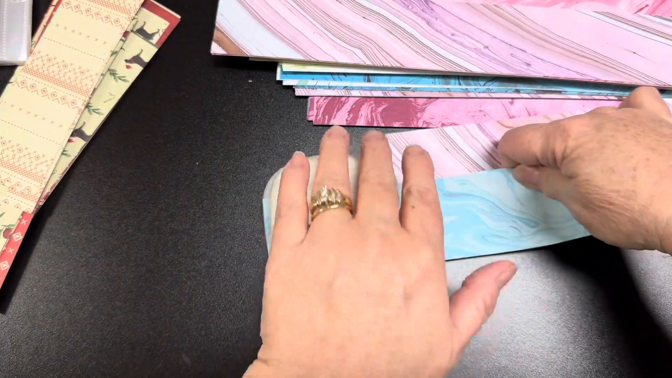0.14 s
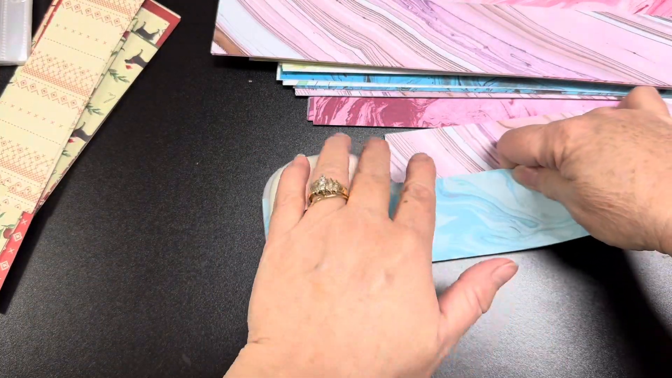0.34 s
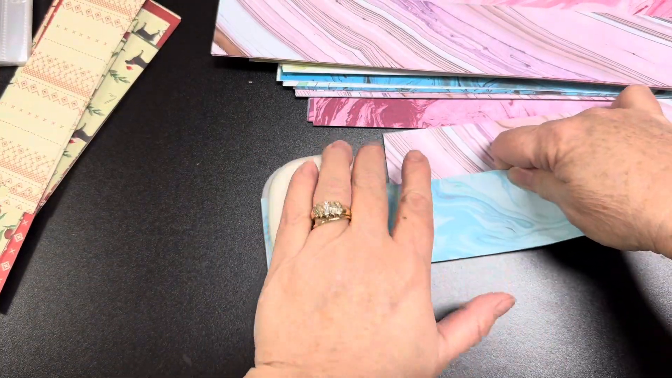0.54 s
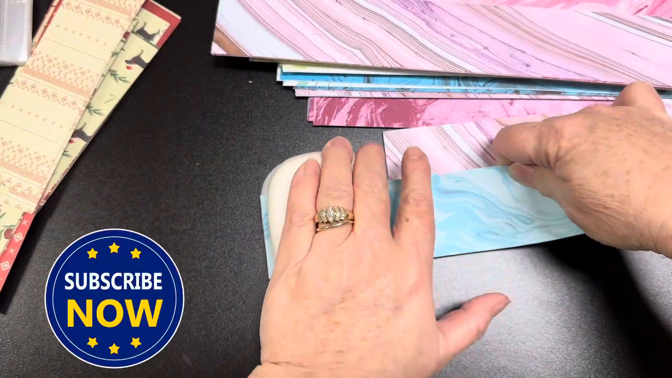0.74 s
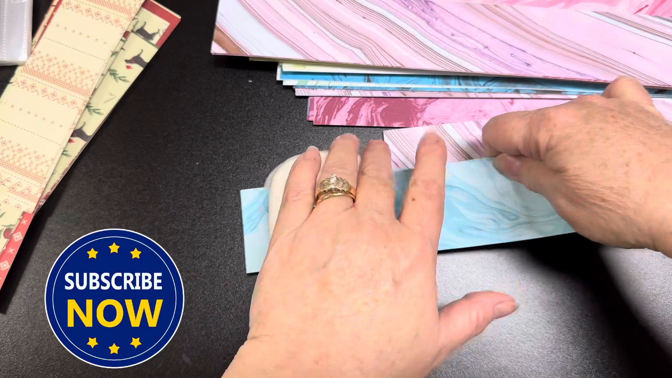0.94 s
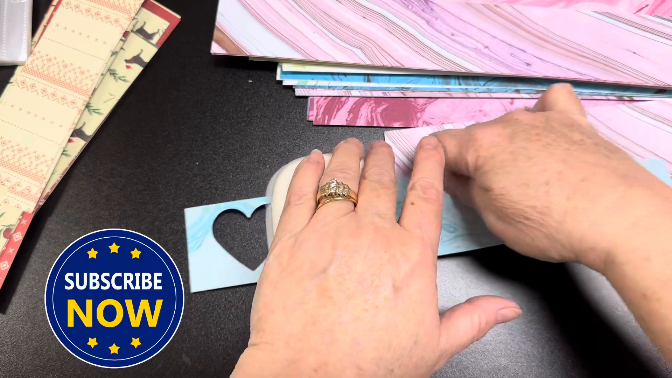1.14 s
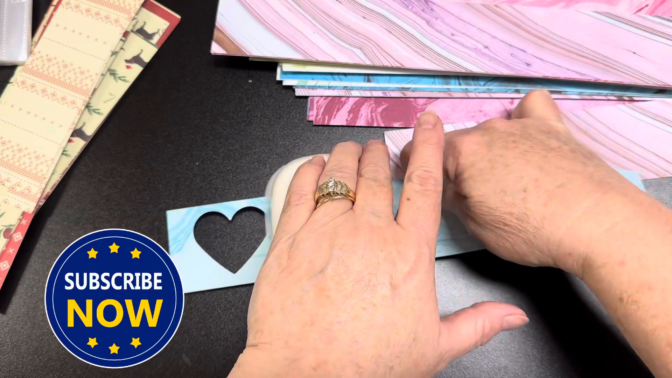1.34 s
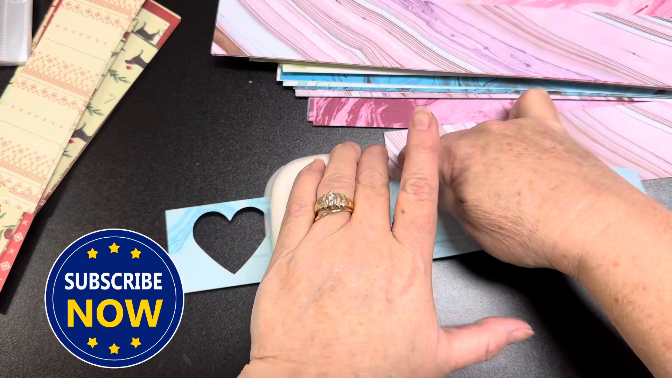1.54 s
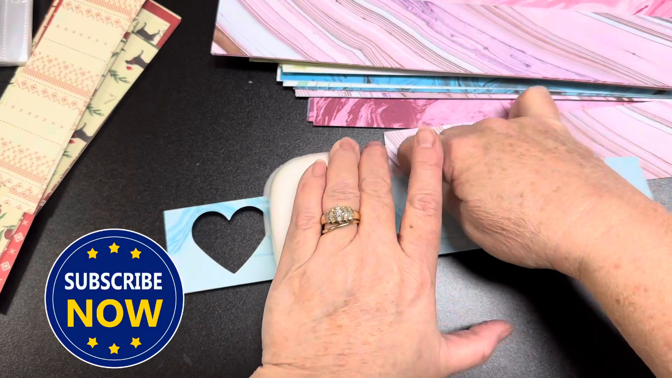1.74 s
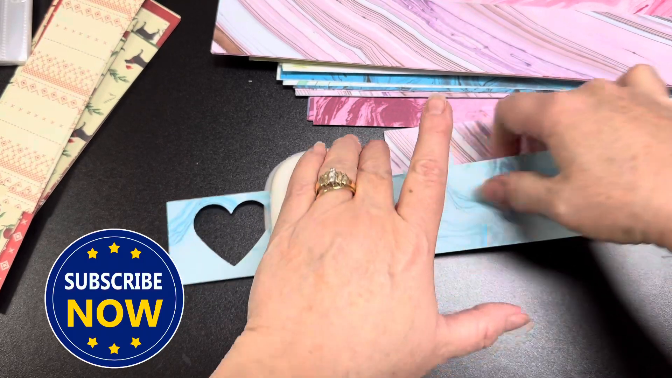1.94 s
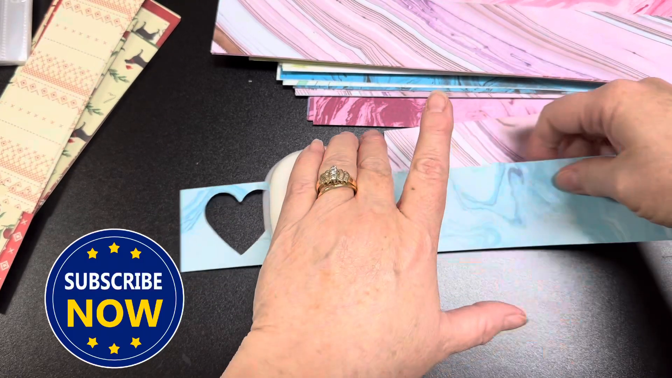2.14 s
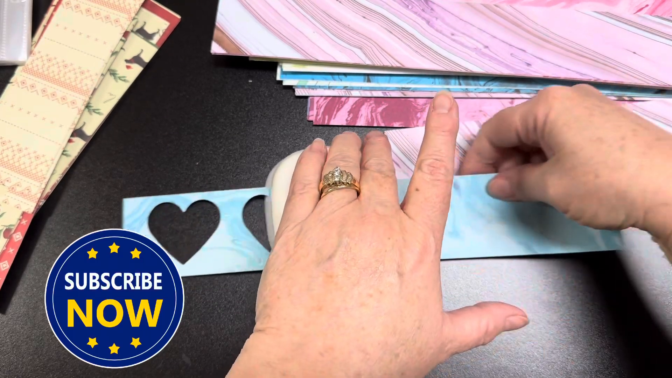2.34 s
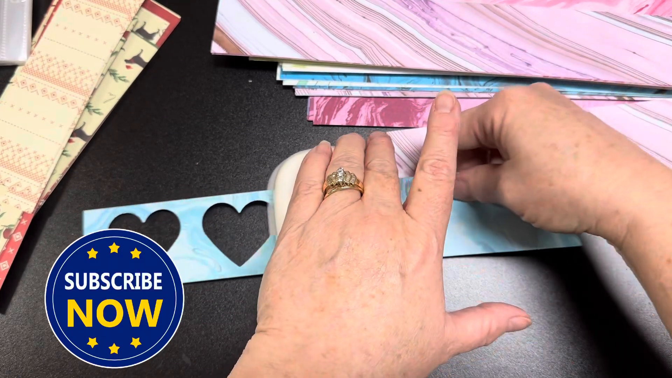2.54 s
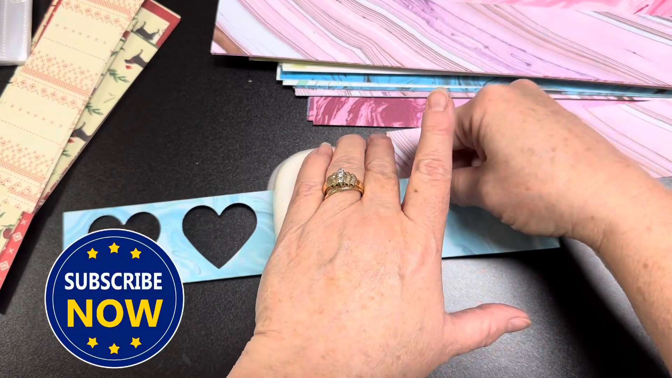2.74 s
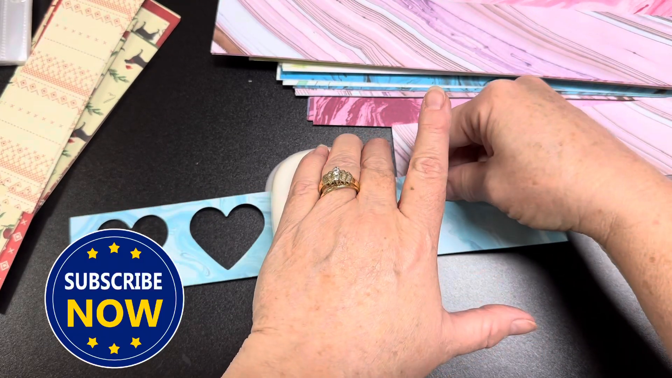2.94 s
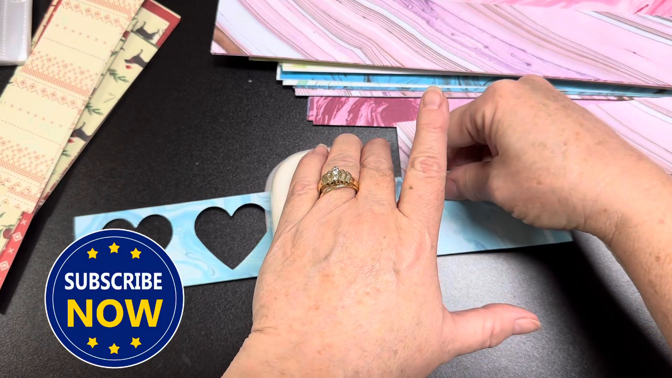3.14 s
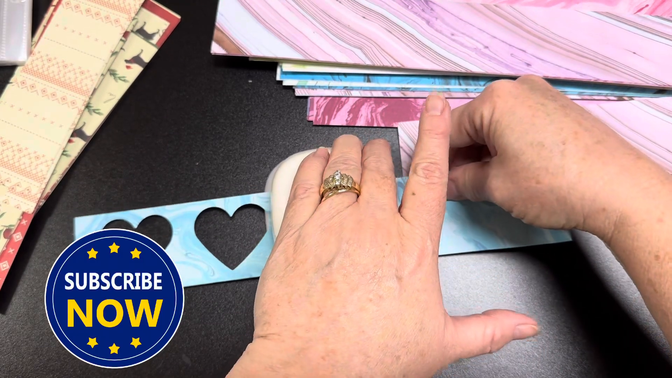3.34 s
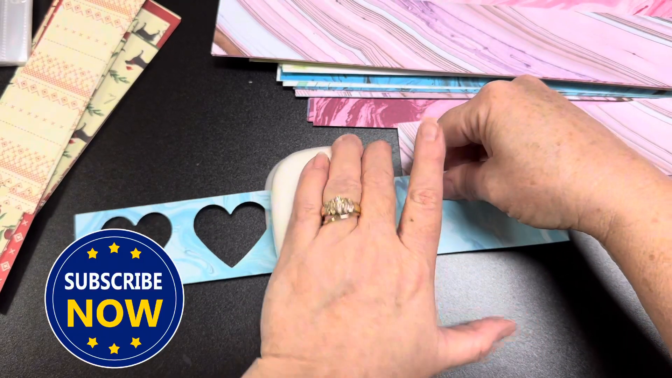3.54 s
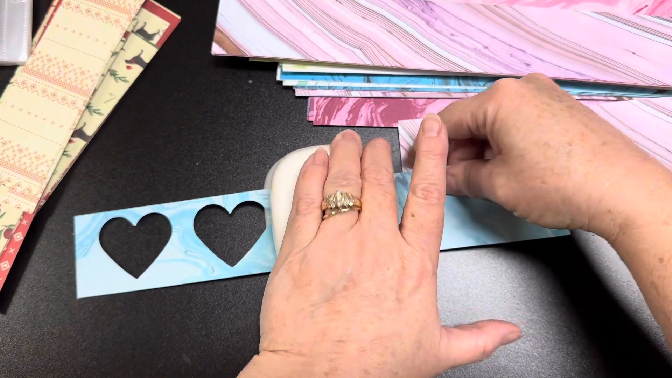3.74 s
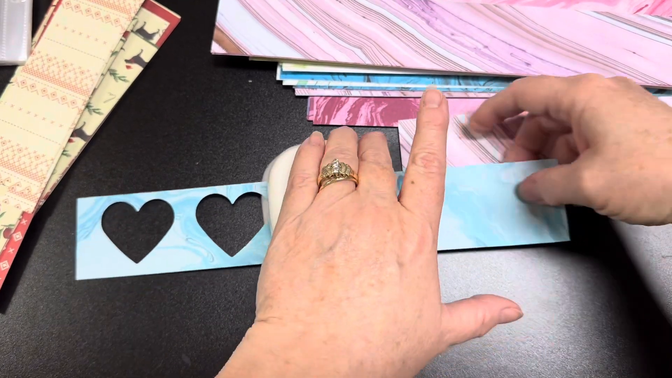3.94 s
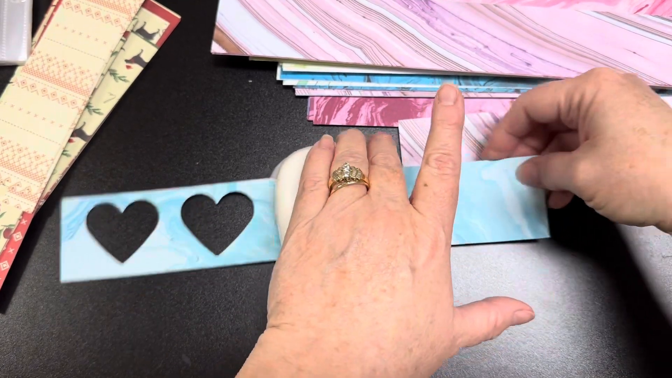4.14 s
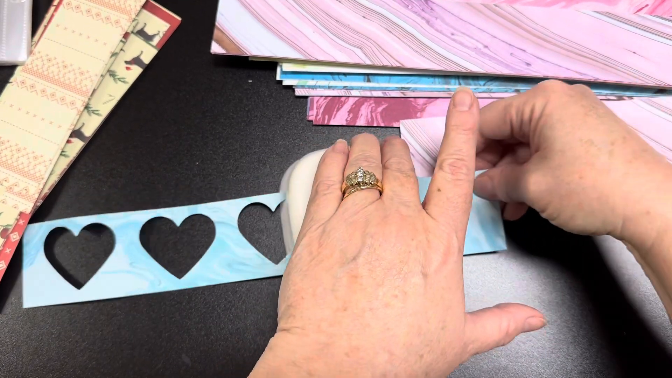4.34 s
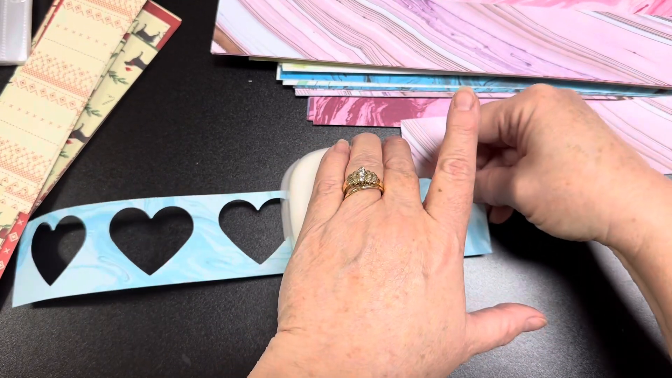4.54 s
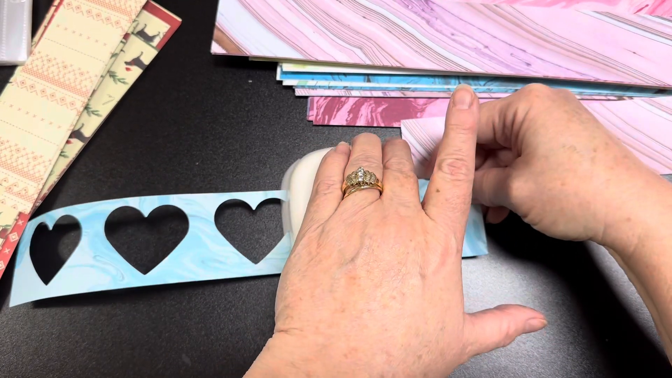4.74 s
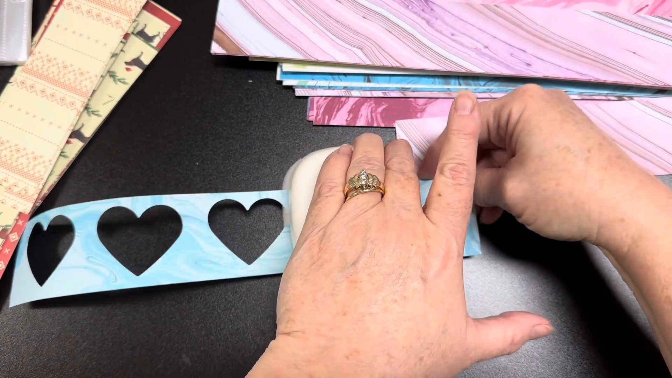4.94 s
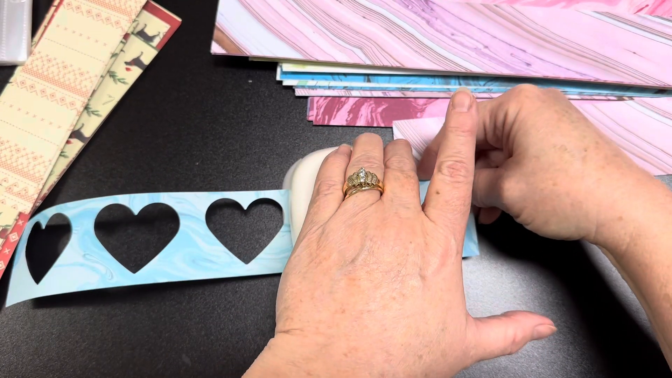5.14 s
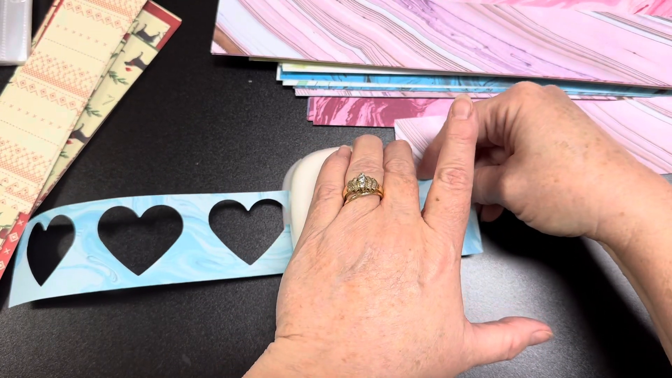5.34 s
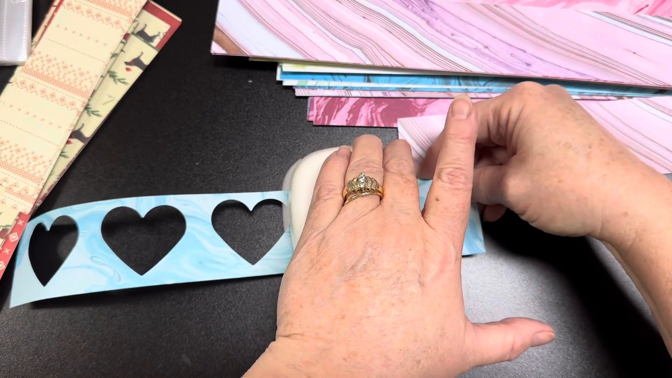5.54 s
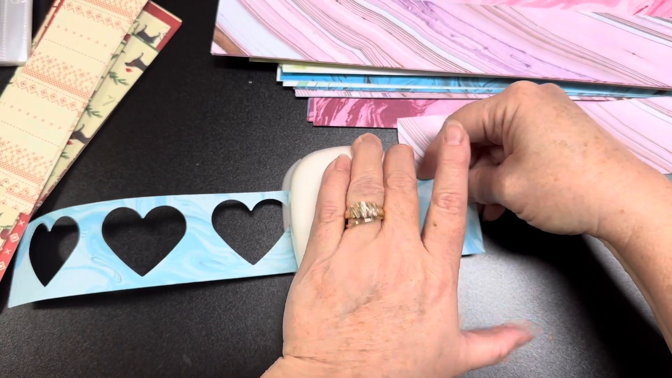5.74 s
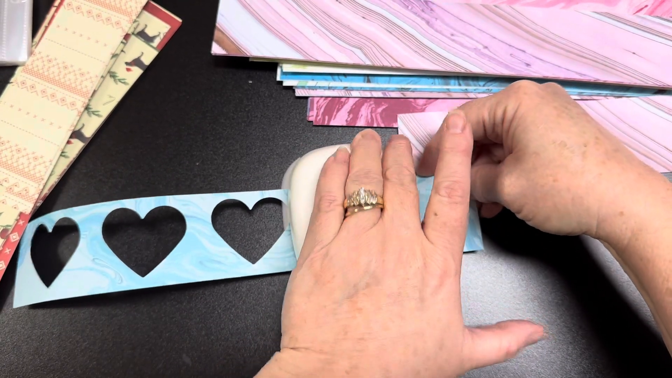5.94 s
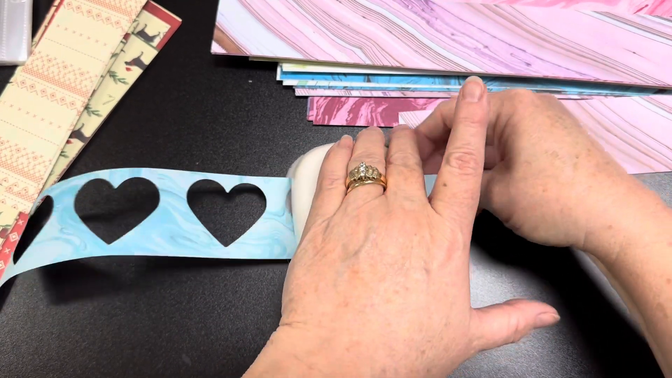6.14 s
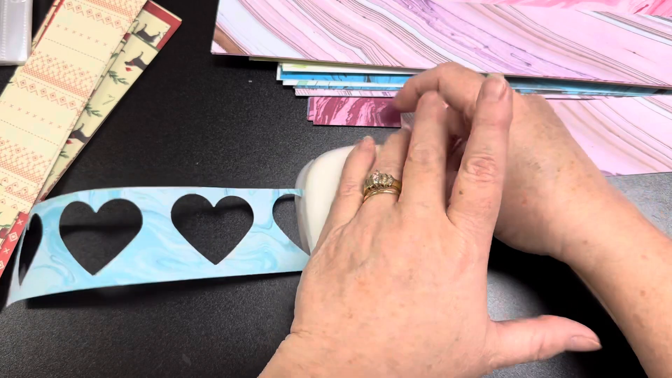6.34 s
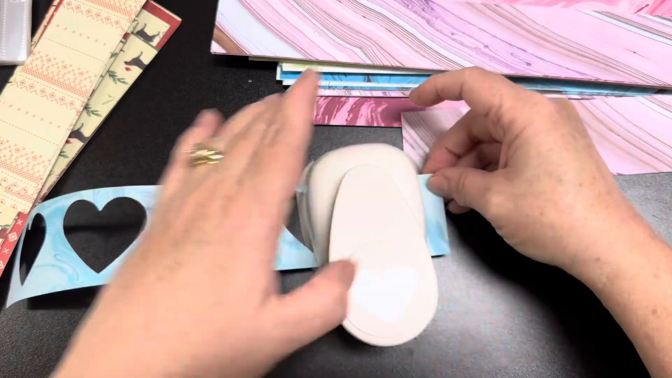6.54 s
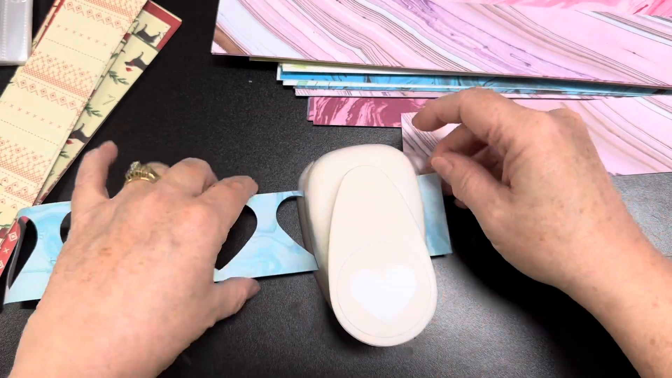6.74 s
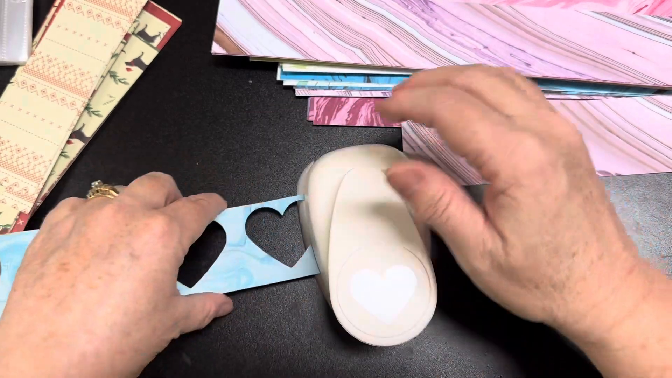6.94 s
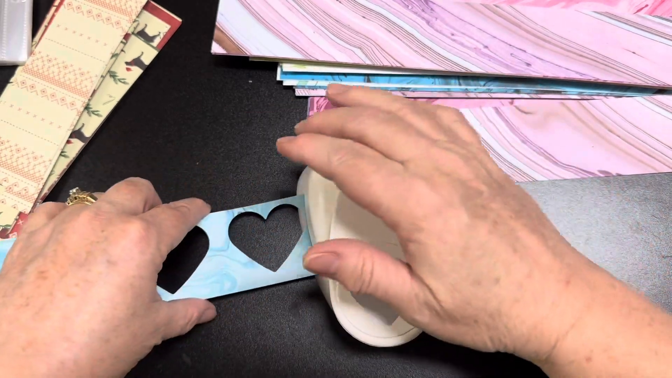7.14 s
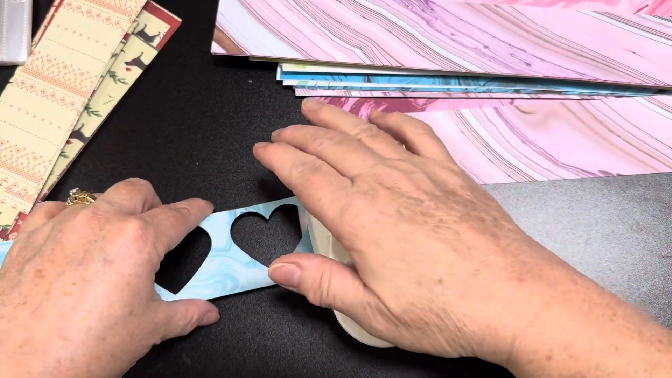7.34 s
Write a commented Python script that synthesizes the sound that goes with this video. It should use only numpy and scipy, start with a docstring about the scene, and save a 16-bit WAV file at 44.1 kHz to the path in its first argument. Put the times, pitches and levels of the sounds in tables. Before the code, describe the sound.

A plastic lever punch is pressed four times through card, each a crunchy double clack with a table thump, card sliding softly between.

```python
"""A plastic lever punch is pressed four times through a card strip on a hollow craft table; a finger ring
taps it before and just after the first press, ringing short modes.
In each press the lever scrapes down, the die shears the card in a crunch of random slips, ringing steel modes
mark the snap through, and the base thumps the table through its deep modes.
The lever then scrapes back up, knocking and rattling; filtered noise grains slide the strip on
between presses and after the last, over shell hum and table rumble from the hands, room tails and faint hiss."""
import sys
import numpy as np
from scipy import signal
from scipy.fft import rfft, irfft, next_fast_len
from scipy.io import wavfile
from scipy.ndimage import uniform_filter1d

SR = 44100
rng = np.random.default_rng(int(sys.argv[2]) if len(sys.argv) > 2 else 0)


def generate_wav(signal):
    """Clip the signal to [-1, 1] and save it as 16-bit WAV at the path in sys.argv[1]."""
    frames = np.transpose(np.atleast_2d(signal))
    scaled = np.clip(frames, -1, 1) * 32767
    pcm = np.round(scaled).astype(np.int16)
    wavfile.write(sys.argv[1], SR, pcm)


N = 326030
T = np.arange(N) / SR
FFT_SIZE = next_fast_len(N)
FFT_HZ = np.fft.rfftfreq(FFT_SIZE, 1 / SR)

# ringing modes of the plastic shell: pitch_hz, relative_level_db, t60_s
SHELL_MODES = [(615, -2, 0.022), (802, -5.5, 0.036), (975, 1.5, 0.03), (1123, -4, 0.04), (1253, -2.5, 0.02),
               (1489, -1.5, 0.025), (1643, -11, 0.052), (1960, -9.5, 0.02), (2173, -17.5, 0.01),
               (2550, -19, 0.022), (3320, -27, 0.019), (3500, -18.5, 0.023)]
# ringing modes of the hollow table: pitch_hz, relative_level_db, t60_s
TABLE_MODES = [(64.8, -5.5, 0.16), (106.2, -5, 0.14), (126.6, -9.5, 0.24), (156.6, -5, 0.15),
               (204, -7.5, 0.18), (227.3, -9.5, 0.27), (248.9, -0.5, 0.17), (303.6, -4, 0.11),
               (347.6, -6, .15), (390.5, -7.5, 0.11), (461, -3.5, 0.048), (504.5, -8.5, 0.061),
               (605, -10.5, 0.054)]
# spectrum of cracking card and plastic: frequency_hz, relative_density_db (per Hz)
CRACK_SPECTRUM = [(1060, -38.5), (1800, 1), (2270, -4.5), (3990, -9), (4760, -13.5), (5530, -11),
                  (6650, -15), (8870, -18), (12200, -48), (15000, -29), (16500, -54.5)]
# spectrum of card hiss and of the air: frequency_hz, relative_density_db (per Hz)
HISS_SPECTRUM = [(470, -52), (800, -22), (967, -4), (1170, -13.5), (2350, -10.5), (6550, -19), (9570, -26),
                 (10300, -35), (11100, -77), (13100, -62.5), (15300, -35.5), (16500, -59)]
# the presses: lever_down_s, die_bites_s, lever_bottoms_s, lever_let_up_s, rattle_starts_s, return_scrape_ends_s,
# mean_shear_level_db, return_scrape_first_db, return_scrape_last_db
PRESS_TIMELINE = [(0.432, 0.484, 0.53, 0.77, 0.8, 0.88, -23, -41.5, -43),
                  (1.492, 1.55, 1.599, 1.806, 1.9, 1.888, -21.5, -45, -44.5),
                  (3.395, 3.452, 3.510, 3.708, 3.789, 3.79, -22.5, -40, -50),
                  (5.596, 5.664, 5.710, 5.904, 5.978, 5.998, -19.5, -37.5, -50.5)]
DOWN, BITE, BOTTOM, LIFT, RATTLE_START, RETURN_END, SHEAR_DB, RETURN_DB, RETURN_END_DB = np.transpose(PRESS_TIMELINE)


def knocks():
    """Contacts of lever, die, card and hand ring the shell, thump the table, crack and leave a rattling tail."""
    # contacts: start_s, shell_level_db, table_level_db, crack_level_db (relative)
    contacts = [(.291, -41, -37.5, -55.5), (.354, -43.5, -62, -41.5), (.398, -52, -49, -42.5),
                (.432, -26.5, -26.5, -31.5), (.477, -30.5, -32, -38), (.494, -18.5, -22, -30),
                (.502, -20.5, -21.5, -25.5), (.523, -31, -21, -29), (.531, -18, -26.5, -23),
                (.542, -38, -20, -18), (.549, -19.5, -25, -34), (.818, -58, -41.5, -43),
                (.83, -21.5, -26.5, -24.5), (0.848, -61.5, -30.5, -41), (.975, -52, -47, -70),
                (1.02, -65, -51, -75), (1.29, -47, -44, -72.5), (1.443, -57, -55.5, -62.5),
                (1.491, -34, -28.5, -37.5), (1.533, -25.5, -31, -39.5), (1.545, -25, -20, -30),
                (1.557, -24, -23.5, -32), (1.567, -32, -21.5, -38.5), (1.575, -20.5, -28.5, -29),
                (1.582, -40, -24.5, -28), (1.595, -21, -18.5, -18.5), (1.844, -37, -52, -58),
                (1.866, -42, -56, -49), (1.883, -26, -24, -33), (2.13, -49, -61.5, -46.5),
                (2.173, -49.5, -57.5, -39.5), (2.29, -60, -66.5, -46), (3.258, -53.5, -49, -79),
                (3.347, -48.5, -49, -53.5), (3.39, -35.5, -34.5, -39), (3.441, -27.5, -26, -29.5),
                (3.455, -18.5, -21.5, -32.5), (3.464, -42, -19.5, -27), (3.473, -14.5, -50, -23),
                (3.486, -42, -17.5, -21), (3.494, -29, -50, -22), (3.504, -21.5, -15.5, -21.5),
                (3.789, -28, -25.5, -33.5), (3.966, -69, -65.5, -57.5), (4.208, -56, -64, -44.5),
                (4.235, -56, -64, -61), (4.269, -51, -61.5, -43), (4.454, -54.5, -75, -56),
                (4.526, -62, -72, -58), (4.751, -57, -52, -66.5), (5.029, -54.5, -58, -71),
                (5.533, -60.5, -61.5, -70), (5.586, -38.5, -30, -41.5), (5.641, -31.5, -31, -40.5),
                (5.658, -20, -19.5, -29.5), (5.671, -16.5, -28, -29.5), (5.677, -21, -18.5, -22.5),
                (5.686, -38, -22, -27), (5.693, -25, -29, -17.5), (5.703, -23, -19, -25),
                (5.708, -26, -18.5, -49), (5.915, -47.5, -57, -38), (5.962, -55, -44, -32),
                (5.978, -23.5, -28, -34.5), (6.037, -43, -55, -59), (6.204, -52.5, -48.5, -68),
                (6.261, -44.5, -76, -59), (6.296, -43, -74, -60.5), (6.33, -51.5, -46, -72.5),
                (6.399, -57.5, -60, -63.5), (6.424, -55, -41.5, -70.5), (6.705, -50, -55, -52),
                (6.776, -56, -63.5, -51)]
    # short crack and long loose rattle: relative_level_db, t60_s
    crack_decays = [(2.5, .02), (-26, 0.36)]
    start_s, shell_db, table_db, crack_db = np.transpose(contacts)
    envelope = sum(dying(start_s, crack_db + db, t60) for db, t60 in crack_decays)
    # a 3.2 ms average, shifted late so that it begins only 0.9 ms ahead of the contact
    envelope = uniform_filter1d(envelope, size=141, origin=30)
    crack = envelope * colour(grains(5000, uneven_db=2.0), CRACK_SPECTRUM)
    thump = strike(start_s, table_db, TABLE_MODES, spread_db=4.0, lag_cycles=.8)
    shell = strike(start_s, shell_db, SHELL_MODES, spread_db=3.5, lag_cycles=1.2)
    return soft(shell, contact_hz=3530) + soft(thump, contact_hz=780) + crack


def bottoming():
    """The whole hand's weight ends each press in a heavy blow that drives only the deep table modes."""
    blow_db = -13.5
    blow = strike(BOTTOM, blow_db, TABLE_MODES[:4], spread_db=2.5, lag_cycles=.6)
    return soft(blow, contact_hz=400)


def die():
    """Fibres give way in dense slips that shake the shell and crackle."""
    growth_db, overrun_s = 2.5, 0.0058    # the cut gets harder towards its end
    slips = grains(1500, uneven_db=3.5)
    cut = strokes(press_strokes(BITE, BOTTOM + overrun_s, SHEAR_DB, growth_db), edge_s=0.0051)
    crunch = amp(-12.0) * colour(slips, CRACK_SPECTRUM)
    return cut * (rubbed(slips, SHELL_MODES) + crunch)


def snaps():
    """The steel die rings briefly in its high modes as it breaks free."""
    # breaks: start_s, relative_level_db
    breaks = [(.5224, -18), (.5302, -10.5), (.5424, -14.5), (1.5758, -20), (1.5823, -13.5), (3.4874, -18),
              (3.493, -13), (3.5034, -29), (5.677, -23.5), (5.687, -12), (5.693, -15.5), (5.7034, -32.5)]
    # ringing modes of the steel: pitch_hz, relative_level_db, t60_s
    steel_modes = [(5200, -2, 0.0096), (5350, -3, 0.014), (5770, 3, 0.0078), (5810, -15, 0.015),
                   (7300, -15, 0.013)]
    start_s, snap_db = np.transpose(breaks)
    return strike(start_s, snap_db, steel_modes, spread_db=3.5, lag_cycles=3.3)


def lever():
    """The lever rubs in its guide, down to the card and back up, and rattles loosely in the shell."""
    # spectrum of the guide scrape: frequency_hz, relative_density_db (per Hz)
    scrape_spectrum = [(290, -34.5), (500, 2), (1010, 4.5), (2220, -5.5), (3210, -3), (4620, -12),
                       (6860, -6.5), (10200, -17.5), (11800, -76.5), (15800, -9.5), (16500, -72.5)]
    down_db, down_change_db = -54.5, -1.5    # mean level going down; its change along the stroke
    rattle_db, rattle_t60_s = -38, 0.15
    down_rows = press_strokes(DOWN, BITE, down_db, down_change_db)
    return_rows = np.transpose([LIFT, RETURN_END, RETURN_DB, RETURN_END_DB])
    envelope = strokes(np.vstack([down_rows, return_rows]), edge_s=0.013)
    rattle = dying(RATTLE_START, rattle_db, rattle_t60_s) * rubbed(grains(500, uneven_db=3.5), SHELL_MODES)
    rub = colour(grains(4000, uneven_db=4.5), scrape_spectrum)
    return rattle + envelope * patchy(rub, patchy_db=2.5, rate_hz=51)


def taps():
    """A finger ring taps the lever in short dry clacks."""
    # taps: start_s, relative_level_db
    ring_taps = [(0.1994, -18.5), (.207, -22), (0.882, -19), (.893, -22.5), (.899, -25)]
    # modes of the tapped lever: pitch_hz, relative_level_db, t60_s
    tapped_modes = [(980, -9.5, 0.056), (1180, -4.5, 0.015), (1266, -1, 0.044), (1397, -5.5, 0.08),
                    (1550, -12, 0.043), (1690, -9, .03), (1930, -10.5, 0.018), (2070, -4.5, 0.012),
                    (2420, -9.5, 0.041), (4170, -15, 0.011), (5400, -25, 0.018), (6540, -21.5, 0.016),
                    (7100, -29.5, .02)]
    start_s, tap_db = np.transpose(ring_taps)
    return soft(strike(start_s, tap_db, tapped_modes, spread_db=2.5, lag_cycles=0.69), contact_hz=8000)


def sliding(rub):
    """Card slides through the slot as uneven hiss and resonance, its fibres snagging at random."""
    # one table for each pull of the strip: time_s, relative_level_db
    pulls = [
        [(.9, -55), (1.104, -48), (1.196, -61.5), (1.28, -82)],
        [(1.92, -61), (1.974, -66), (2.164, -57.5), (2.27, -58.5), (2.31, -54.5), (2.36, -58.5), (2.472, -55.5),
         (2.5, -61), (2.704, -65.5), (2.756, -88.5)],
        [(2.774, -71), (2.838, -64), (3.02, -71.5), (3.1, -84.5), (3.2, -86.5)],
        [(3.926, -85), (4.064, -55.5), (4.27, -58.5), (4.398, -71.5), (4.442, -64.5), (4.644, -77)],
        [(4.76, -74.5), (4.84, -66.5), (4.942, -62), (4.986, -79.5)],
        [(5.262, -89.5), (5.312, -62.5), (5.366, -69.5), (5.406, -91)],
        [(6.02, -58), (6.206, -59.5), (6.25, -75), (6.3, -65.5), (6.558, -83)],
        [(6.565, -83.5), (6.618, -62.5), (6.64, -82.5)],
        [(6.68, -84.5), (6.702, -55), (6.832, -69.5), (6.9, -60.5), (6.94, -67.5), (7.39, -70.5)],
    ]
    # ringing modes of the card: pitch_hz, relative_level_db, t60_s
    card_modes = [(1313, -9.5, 0.03), (1900, -17, 0.023), (2265, 14, 0.011), (2760, 0.5, 0.028),
                  (3200, 4, 0.0063)]
    time_s, level_db = np.vstack(pulls).T
    moving = sum((T > rows[0][0]) & (T < rows[-1][0]) for rows in pulls)
    envelope = uniform_filter1d(moving * 1., size=801) * amp(np.interp(T, time_s, level_db))    # 18 ms edges
    hiss = amp(-1.5 + 1.66 * drift(25)) * patchy(colour(rub, HISS_SPECTRUM), patchy_db=2.3, rate_hz=10)
    body = amp(-9.5 + 1.83 * drift(8.7)) * rubbed(rub, card_modes)
    catches_per_s, catch_db = 67, -11.5
    snags = grains(catches_per_s, uneven_db=1.5)
    catches = amp(catch_db) * rubbed(snags, card_modes + SHELL_MODES[3:])
    return envelope * (hiss + body + catches)


def dragging(rub):
    """The card edge drags on the shell so that it sings: rubbing passed twice through one shell mode."""
    # drags: start_s, end_s, first_level_db, last_level_db
    drags = [(1.03, 1.24, -44, -56.5)]
    one_mode = SHELL_MODES[2:3]
    return strokes(drags, edge_s=0.04) * rubbed(rubbed(rub, one_mode), one_mode)


def hands_and_table():
    """Resting, shifting hands excite shell and table with noise; the table rumbles on after each press."""
    # hands on punch and table: time_s, shell_hum_level_db, table_rumble_level_db (before slow drift)
    hand_levels = [(0.0, -69.5, -65), (.2, -64, -63), (.39, -54, -57.5), (1.01, -64, -56),
                   (1.2, -75.5, -79.5), (1.4, -74, -66.5), (1.65, -60.5, -55.5), (2.24, -69.5, -64.5),
                   (3.04, -80, -71), (3.58, -55.5, -53), (3.891, -85.5, -81.5), (4.12, -48.5, -44),
                   (4.24, -58, -52), (4.32, -71.5, -76), (4.96, -67.5, -63), (5.211, -68.5, -65.5),
                   (5.4, -85, -79), (6.009, -54, -51.5), (6.2, -67, -55), (6.35, -59, -51.5),
                   (6.46, -67.5, -52.5), (6.54, -84, -76), (6.89, -69, -64), (7.39, -68.5, -61)]
    time_s, *levels_db = np.transpose(hand_levels)
    hum, rumble = [amp(np.interp(T, time_s, db) + 1.5 * drift(25)) for db in levels_db]
    shudder_db, shudder_t60_s = -36, 0.41     # after the lever bottoms
    relief_db, relief_t60_s = -43.5, 0.36     # again as the lever rattle starts
    rumble = rumble + dying(BOTTOM, shudder_db, shudder_t60_s) + dying(RATTLE_START, relief_db, relief_t60_s)
    shell = hum * rubbed(rng.standard_normal(N), SHELL_MODES[:5])
    return shell + rumble * rubbed(rng.standard_normal(N), TABLE_MODES)


def room(x):
    """Two diffuse tails of octave-band noise, each octave dying at its own rate."""
    # decay of the room: frequency_hz, t60_s
    room_decay = [(100, 0.15), (500, 0.23), (2000, 0.21), (6000, 0.26), (12000, 0.087)]
    t, tails = T[:SR], 0
    for low_hz in 60 * 2. ** np.arange(8):
        octave = signal.butter(2, [low_hz, 2 * low_hz], "band", fs=SR, output="sos")
        band = signal.sosfilt(octave, rng.standard_normal((2, SR)))
        tails = tails + band * amp(-60 * t / at_hz(room_decay, 1.4 * low_hz))
    tails = tails * np.clip(t / 0.013, 0, 1)    # the tails build up over 13 ms
    tails = tails / np.sqrt(np.sum(tails[0] ** 2))
    return signal.fftconvolve(x[None], tails, axes=1)[:, :N]


def amp(db):
    """Gain of a level in dB."""
    return 10 ** (np.asarray(db) / 20)


def rms_one(x):
    """Scale to rms 1."""
    return x / np.sqrt(np.mean(x ** 2) + 1e-20)


def at_hz(points, hz):
    """Read a curve on a log frequency axis."""
    p = np.array(points)
    return np.interp(np.log(np.maximum(hz, 1)), np.log(p[:, 0]), p[:, 1])


def colour(x, spectrum):
    """Filter by a spectrum that keeps the power of white noise."""
    gain = rms_one(amp(at_hz(spectrum, FFT_HZ)))
    return irfft(rfft(x, FFT_SIZE) * gain, FFT_SIZE)[:N]


def ring(x, hz, t60):
    """A two-pole resonator: a unit click sets a dying sine of starting height 1 ringing."""
    r, w = amp(-60 / (t60 * SR)), 2 * np.pi * hz / SR
    return signal.lfilter([0, np.sin(w)], [1, -2 * r * np.cos(w), r * r], x + 1e-18)


def strike(times, levels_db, modes, spread_db, lag_cycles):
    """Every blow excites each mode with its own strength; bending waves bring the low modes later."""
    out = np.zeros(N)
    chance = rng.standard_normal((len(times), len(modes)))
    for k, (hz, mode_db, t60) in enumerate(modes):
        clicks = np.zeros(N)
        at = np.round((times + lag_cycles / hz) * SR).astype(int)
        heights = amp(levels_db + mode_db + spread_db * chance[:, k])
        np.add.at(clicks, at, (-1) ** k * heights)
        out += ring(clicks, hz, t60)
    return out


def soft(x, contact_hz):
    """A yielding contact leaves out the top of a blow."""
    return signal.sosfilt(signal.butter(2, contact_hz, fs=SR, output="sos"), x)


def rubbed(x, modes):
    """A continuing excitation heard through a set of modes; rms 1."""
    return rms_one(sum((-1) ** k * amp(db) * ring(x, hz, t60) for k, (hz, db, t60) in enumerate(modes)))


def grains(per_s, uneven_db):
    """Random slips of uneven size and either sign; rms 1."""
    sizes = amp(uneven_db * np.minimum(rng.exponential(1, N), 4)) * rng.choice([-1, 1], N)
    return rms_one(sizes * (rng.random(N) < per_s / SR))


def press_strokes(start, end, mean_db, change_db):
    """One stroke row for each press, its level sloping evenly in dB."""
    mean_db = mean_db + np.zeros(len(start))
    return np.transpose([start, end, mean_db - change_db / 2, mean_db + change_db / 2])


def strokes(rows, edge_s):
    """Envelope of strokes with short linear edges and a level sloping in dB."""
    envelope = 0
    for start, end, first_db, last_db in rows:
        edges = np.clip(np.minimum(T - start, end - T) / edge_s, 0, 1)
        envelope = envelope + amp(np.interp(T, [start, end], [first_db, last_db])) * edges
    return envelope


def dying(times, levels_db, t60):
    """Envelope that jumps at each time and dies away exponentially."""
    starts = np.zeros(N)
    np.add.at(starts, np.round(times * SR).astype(int), amp(levels_db))
    return signal.lfilter([1], [1, -amp(-60 / (t60 * SR))], starts + 1e-18)


def drift(rate_hz):
    """Slow chance: noise at every 40th sample through a double one-pole low-pass; spread 1."""
    r = np.exp(-80 * np.pi * rate_hz / SR)
    slow = signal.lfilter([1], [1, -2 * r, r * r], rng.standard_normal(N // 40 + 2002))
    slow = slow[2000:]    # drop the filter's settling
    return np.interp(np.arange(N) / 40, np.arange(len(slow)), rms_one(slow))


def patchy(x, patchy_db, rate_hz):
    """Each band of a rubbing noise swells and fades on its own; alternate signs keep the joins flat."""
    edges_hz = [300, 1500, 2800, 4500, 6500, 9000, 20000]
    out = 0
    for k, limits_hz in enumerate(zip(edges_hz, edges_hz[1:])):
        band = signal.sosfilt(signal.butter(2, limits_hz, "band", fs=SR, output="sos"), x)
        out = out + (-1) ** k * amp(patchy_db * drift(rate_hz)) * band
    return out


def scene():
    """Mid and side of the table scene, turned into left and right."""
    # stereo width of two close microphone ports: frequency_hz, side_minus_mid_db
    port_width = [(60, -29), (150, -29), (300, -18), (600, -3.5), (1100, -21), (2200, -20), (4400, -9),
                  (8100, 0), (15000, 10)]
    blows = knocks() + bottoming() + die() + lever()
    steel = snaps() + taps()
    rub = grains(9000, uneven_db=1.5)
    rubs = sliding(rub) + dragging(rub) + hands_and_table()
    wet = amp(-17) * room(blows + amp(-4) * steel)    # the hand shades die and finger ring from the walls
    air = amp(-80) * colour(rng.standard_normal(N), HISS_SPECTRUM)
    mid = blows + steel + wet[0] + rubs + air
    # the ports' side signal is the mid a quarter cycle off, strongest in the treble
    ports = irfft(rfft(mid, FFT_SIZE) * 1j * amp(at_hz(port_width, FFT_HZ)), FFT_SIZE)[:N]
    # the wide rubbing sources reach one port again by a late reflection (31 ms, wrapping at the end)
    late = np.roll(rubs, round(.031 * SR))
    side = ports + amp(-8) * wet[1] + amp(-14) * late + amp(-31.0) * mid + amp(-26.5) * rubs
    return np.array([mid + side, mid - side])


def record(dry):
    """The deep bass is cut, peaks are rounded, the top is cut."""
    ceiling, drive_db, cutoff_hz = .88, 2.5, 16800
    x = signal.sosfilt(signal.butter(4, 48, "high", fs=SR, output="sos"), dry)
    rounded = ceiling * np.tanh(amp(drive_db) * x / ceiling)
    return signal.sosfilt(signal.cheby2(12, 70, cutoff_hz, fs=SR, output="sos"), rounded)


dry = scene()
out = record(dry)
generate_wav(out)
```